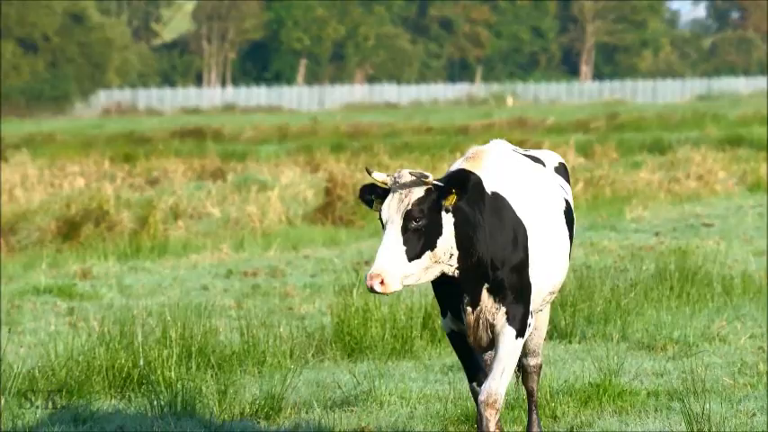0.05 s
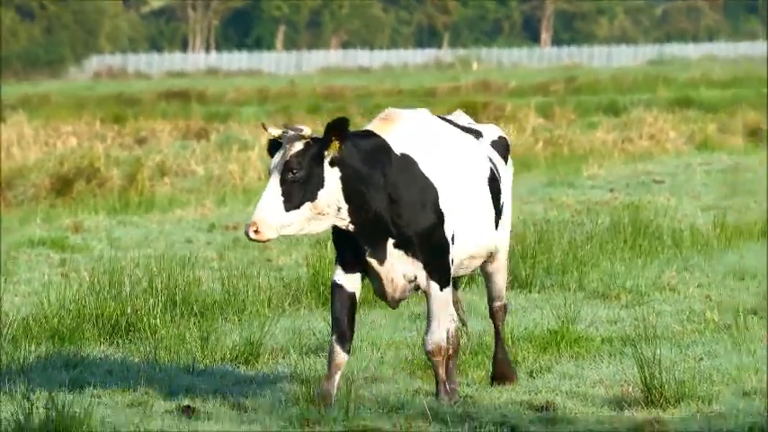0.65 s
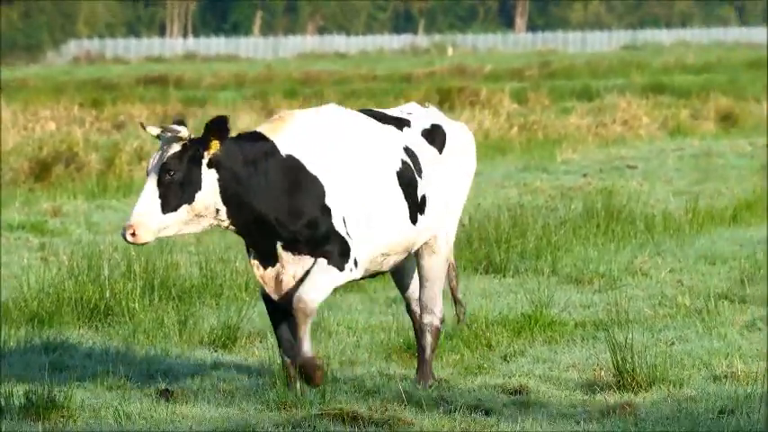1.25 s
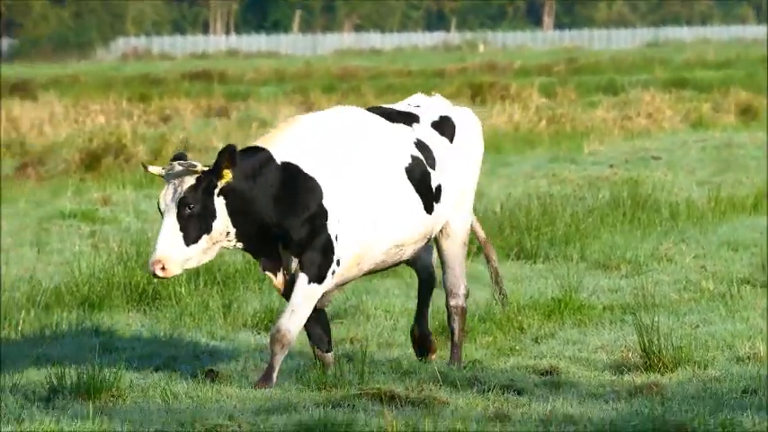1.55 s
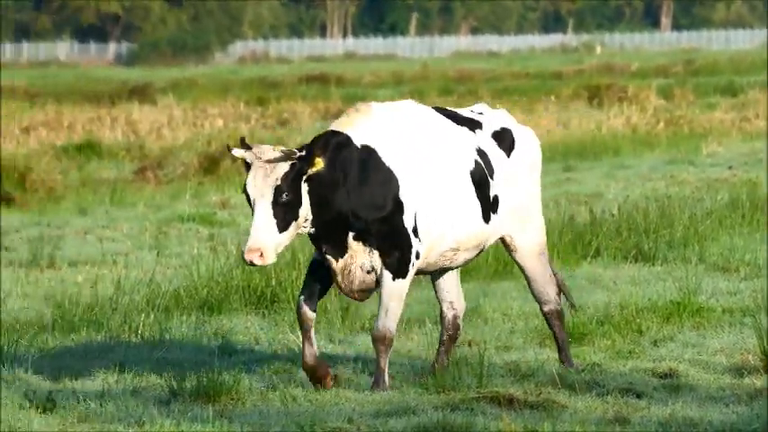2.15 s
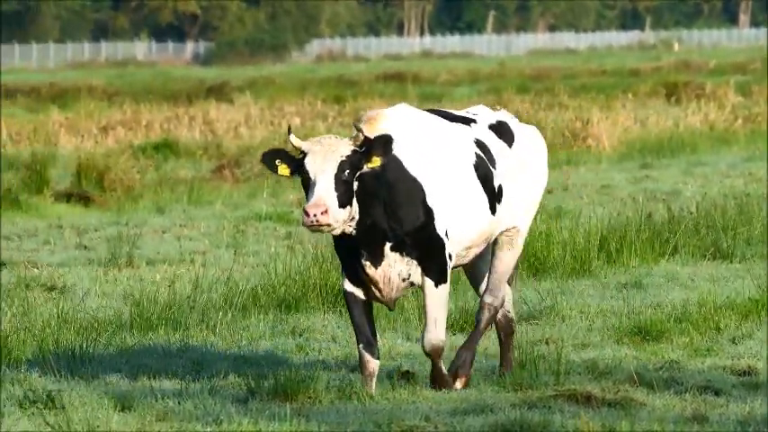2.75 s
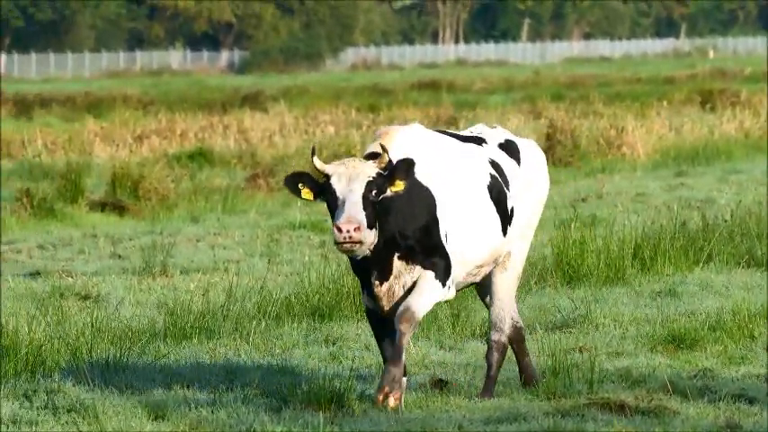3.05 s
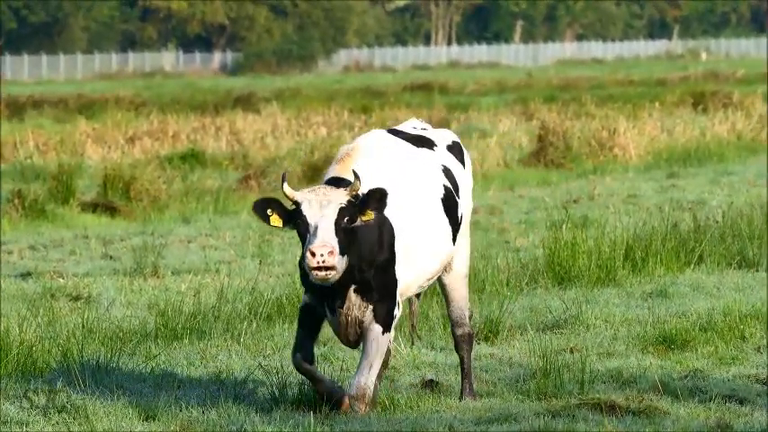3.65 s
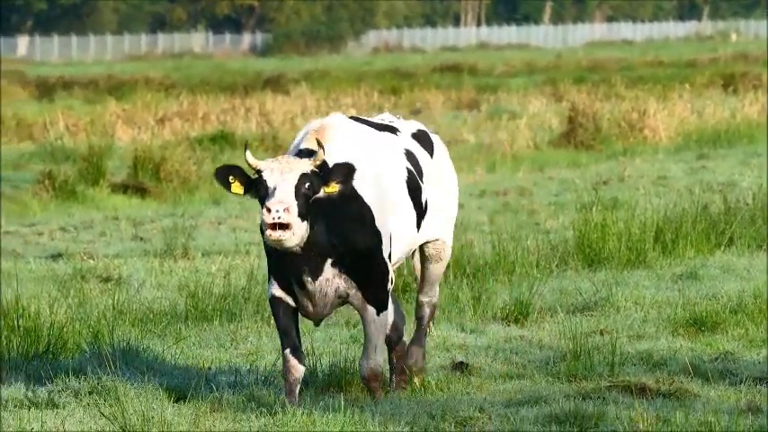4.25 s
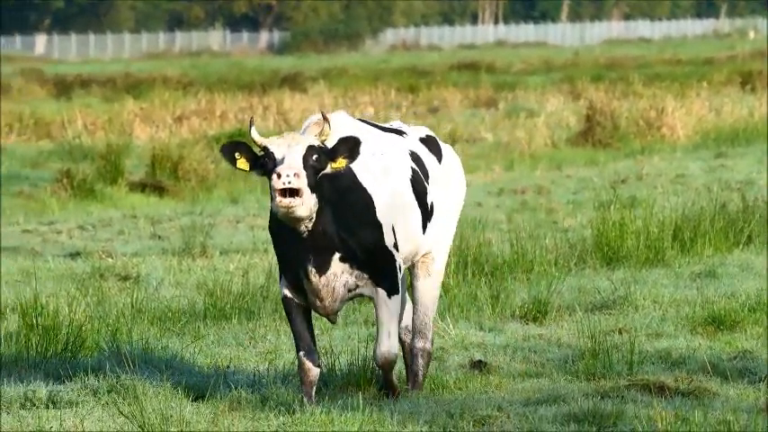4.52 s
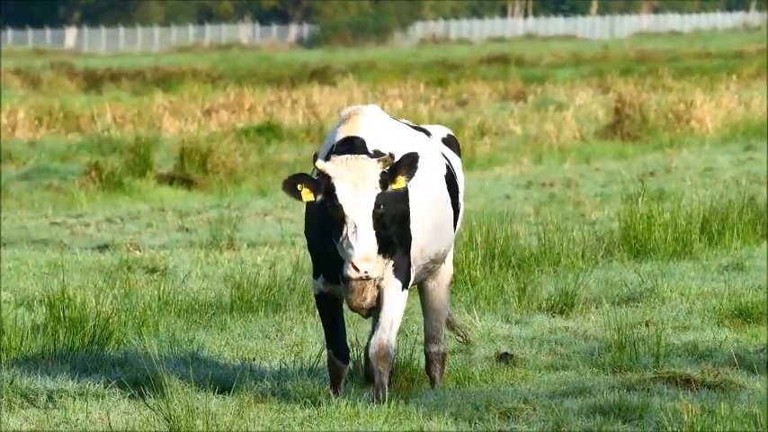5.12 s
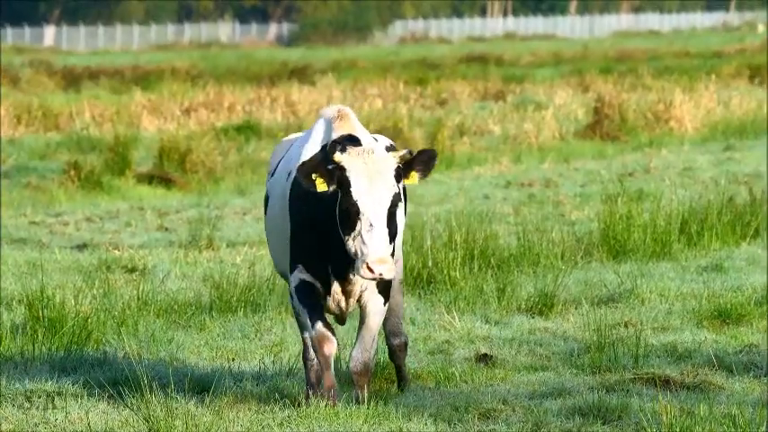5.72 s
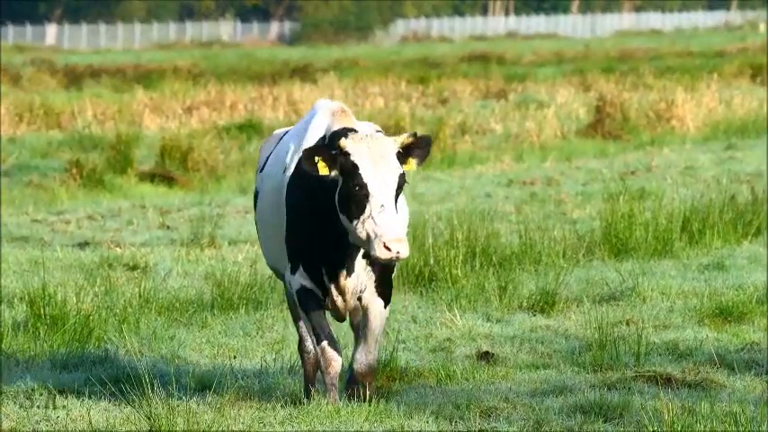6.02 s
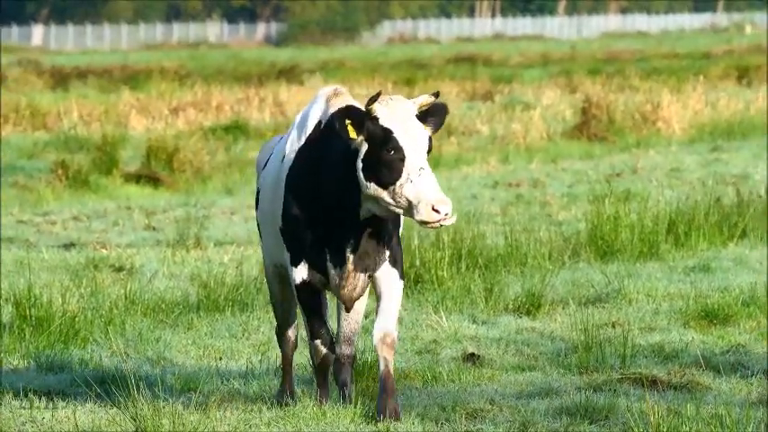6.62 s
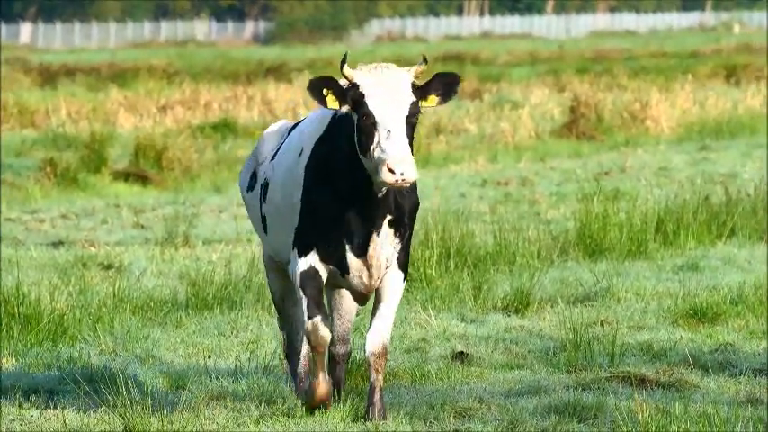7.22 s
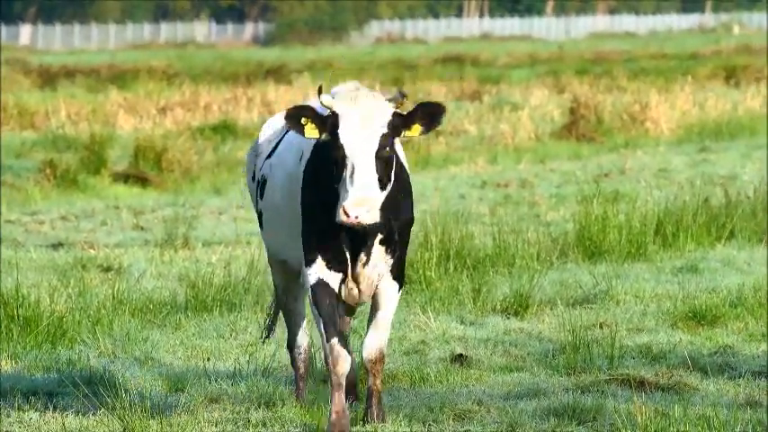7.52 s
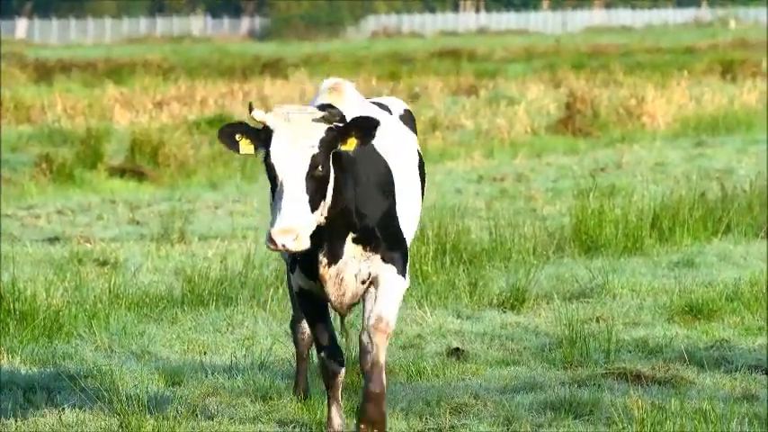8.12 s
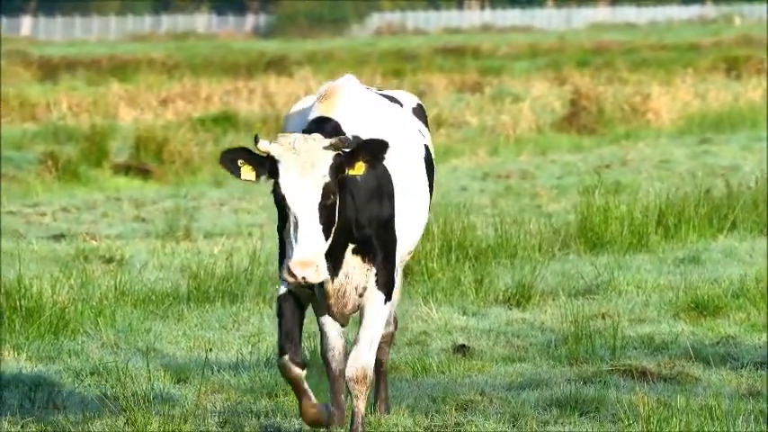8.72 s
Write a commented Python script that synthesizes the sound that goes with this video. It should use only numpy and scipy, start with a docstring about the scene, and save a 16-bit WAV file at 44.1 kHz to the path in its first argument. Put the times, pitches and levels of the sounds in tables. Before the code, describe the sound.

One cow bellow climbs from a low growl to a roar, over wind on the microphone, faint bird chirps and hooves in grass.

```python
"""Wind rumbles on the microphone over a distant wash; hooves thud and tick in the grass, and a small
bird repeats one rising, two-voiced call. Then the walking cow bellows once: a low pulsing growl
climbs, breaks into a rough roar, clears and drops. Its vocal folds pulse through a moving mouth over
a booming chest, and flapping tissue adds the grit. A far tree line answers."""
import sys
import numpy as np
from scipy import signal
from scipy.fft import rfft, irfft, next_fast_len
from scipy.io import wavfile
from scipy.ndimage import uniform_filter1d, minimum_filter1d, map_coordinates

SR = 44100
rng = np.random.default_rng(int(sys.argv[2]) if len(sys.argv) > 2 else 0)


def dump_mix(stems):
    """Bounce the given channels to the path in sys.argv[1] as a 16-bit WAV at rate SR."""
    frames = np.atleast_2d(stems).T  # one column per channel
    limited = np.clip(frames, -1, 1)  # hard clip at full scale
    pcm = np.round(limited * 32767).astype(np.int16)
    wavfile.write(sys.argv[1], SR, pcm)


N = 391166

# wind rumble between gusts: t/s, level/dB
BREEZE = [(0, -21), (.9, -17.5), (1.5, -19), (2.2, -16.5), (2.7, -28), (4.6, -38), (5.4, -29.5),
          (7.6, -28.5), (8.87, -20)]
# gusts: t/s, level/dB, half length/s
GUSTS = [(.23, -19, 0.095), (.68, -7.5, 0.052), (5.27, -30.5, 0.046), (6.1, -29.5, 0.051),
         (6.62, -33, 0.017), (7.17, -34.5, 0.043), (8.2, -28, 0.033)]
# EQ of the wind's rumble and buffeting, and of the country's wash and hiss: f/Hz, level/dB
RUMBLE_EQ = [(8, 5.5), (20, -7), (27, 18.5), (34, 0.5), (48, -17.5), (80, -37.5), (250, -120)]
BUFFET_EQ = [(30, -21), (50, -1.5), (80, -6), (120, -12.5), (200, -23.5), (400, -44.5), (1500, -110)]
WASH_EQ = [(120, -18), (200, -5), (355, -7), (431, -8.5), (582, -8.5), (698, -6), (1310, -10.5),
           (1490, -13), (2890, -25), (4500, -28), (5850, -73), (9900, -120)]
HISS_EQ = [(1500, -22.5), (3000, -7), (4200, -2.5), (5300, 4.5), (7000, 0.5), (10000, -2.5), (15700, -6)]
# hoof falls: t/s, level/dB, thud f/Hz
HOOVES = [(0.135, -33, 252), (1.567, -35.5, 680), (2.074, -25.5, 381), (5.949, -26.5, 223),
          (6.527, -41, 332), (6.759, -31.5, 340), (7.573, -38, 321), (8.523, -35.5, 266),
          (8.81, -33.5, 360)]
# stalks snapping: t/s, relative level/dB
STALKS = [(0.136, -32), (0.597, -31.5), (0.9164, -41), (0.9746, -39), (1.024, -39.5), (1.38, -41),
          (2.1055, -38), (2.313, -40.5), (2.8568, -34), (7.2773, -40), (7.53, -42), (8.4731, -38),
          (8.524, -37), (8.6327, -38.5)]
# legs brushing the grass: t/s, level/dB, half length/s
BRUSHES = [(5.661, -54, 0.0222), (5.963, -49, 0.021), (6.544, -54, 0.018), (7.206, -42.5, 0.037),
           (8.76, -45.5, 0.044)]
# EQ of snaps, brushes and ticks: f/Hz, level/dB
SNAP_EQ = [(500, 1), (6000, 5), (15000, -7)]
BRUSH_EQ = [(300, -21), (900, 10), (1600, 7), (2800, -10), (5500, -11), (14000, -32)]
TICK_EQ = [(1000, -14.5), (5500, 3.5), (15000, -11.5)]
# bird calls: top note t/s, relative sweep level/dB, relative whistle level/dB, top note accent/dB
CALLS = [(0.333, -36.5, -47, -4), (1.783, -34.5, -41.5, -1.5), (3.492, -49, -59.5, 6.5),
         (5.208, -42.5, -52, 5), (6.783, -38, -48, -1), (8.137, -37, -40, 7)]
# the two voices of a call: t/s from the top note, f/Hz, relative level/dB
SWEEP = [(-.15, 2400, -26), (-.13, 2520, -17.5), (-.05, 3100, -13), (-.035, 3485, -5.5), (-.02, 3613, -4.5),
         (-.01, 3950, -2), (0, 4417, -0.5), (.018, 4450, -4.5), (.032, 4380, -29)]
WHISTLE = [(-.15, 4600, -28), (-.135, 4900, -3), (-.095, 5350, -6), (-.06, 5850, -11), (-.045, 5950, -36)]
# pitch of the bellow: t/s, f/Hz
PITCH = [(2.38, 61.72), (2.69, 93.2), (2.74, 104.4), (2.9, 129.4), (3.0, 167.4), (3.12, 204.1),
         (3.17, 237.7), (3.4, 239.8), (3.46, 258.6), (3.58, 253.7), (3.79, 275.1), (4.01, 276.3),
         (4.35, 300.5), (4.61, 308.5), (4.8, 304.5), (4.91, 293.5), (4.95, 274), (5.0, 201.6)]
# how hard the cow pushes: t/s, throat level/dB
EFFORT = [(2.38, -44), (2.5, -35.5), (2.68, -24), (2.76, -30), (2.83, -26), (3.34, -25.5), (3.48, -29),
          (3.98, -27.5), (4.1, -32.5), (4.38, -25), (4.66, -23.5), (4.87, -25), (4.97, -30), (5.0, -51)]
# rough spells of the larynx: start t/s, end t/s, roughness, added breath share
SPELLS = [(2.998, 3.153, 1.03, 0.26), (3.141, 3.491, .62, 0.44), (3.66, 3.865, 0.41, 0.4),
          (4.496, 4.684, 0.04, 0), (4.687, 4.813, .17, 0.2), (4.945, 5.05, .6, 0.58)]
# mouth moves: t/s, opening (0 shut, 1 half, 2 taut, 3 wide; more only lifts the rasp), resonance factor
MOUTH = [(2.45, 1.3, 1.105), (2.68, 0, 1.036), (2.95, 1.13, 0.99), (3.2, 1, 0.96), (3.45, 1, 0.96),
         (4.02, 2.5, 1.014), (4.13, 5, 1.01), (4.3, 2.5, 1.036), (4.6, 4.5, 0.98), (4.98, 2.5, 0.976)]
# throat resonances from nearly shut to wide open: f/Hz, level/dB
SHUT = [(200, -76.5), (340, -1), (460, -7.5), (560, -23.5), (850, 1), (1230, -6), (1440, 13), (1780, -5),
        (2000, 3), (2220, -28), (2660, -2.5), (3100, -20), (4500, -28.5), (7000, -80.5)]
HALF = [(120, -78.5), (320, 4), (470, -7), (560, -16.5), (680, -11), (830, 5.5), (990, -1.5), (1170, -0.5),
        (1560, 0.5), (1950, -8.5), (2550, -13), (3200, -29.5), (7000, -78.5)]
TAUT = [(150, -65), (380, -1), (680, -17.5), (830, -2), (950, -3.5), (1100, 7), (1380, 4), (1650, -5),
        (2450, 0.5), (2700, -15.5), (3600, -43), (7000, -89)]
WIDE = [(150, -63), (380, -2), (520, -15), (720, -12), (880, 9.5), (1040, -7), (1300, 5.5), (1850, -5.5),
        (2300, -9.5), (2800, -17), (3350, -28.5), (3900, -42), (7000, -91.5)]
# what chest and nose let through: f/Hz, level/dB
CHEST_EQ = [(70, 2), (250, 0.5), (290, 0.5), (312, -3.5), (380, -7.5), (475, -8), (520, -27), (570, -48.5),
            (600, -18.5), (620, -10.5), (700, -34), (900, -73.5)]
# EQ of the voice's rasp, its treble flare and its scatter off the turf: f/Hz, level/dB
RASP_EQ = [(2200, -70), (3500, -9.5), (4100, -16), (4900, 1), (5400, -0.5), (6500, -14.5), (7100, -11.5),
           (7800, -21), (9200, -25), (11500, -39.5), (15500, -53.5)]
FLARE_EQ = [(4000, -50.5), (7800, 1), (9200, 2), (12500, -15), (15500, -28.5)]
TURF_EQ = [(400, -40), (900, -6), (1500, 0)]

WASH_DB, HISS_DB, BUFFET_DB = -45.5, -58.5, -26
DUCK_DB, DUCK_S, RETURN_DB_PER_S = 6.5, 0.32, 1.27  # the bed sinks behind the roar and creeps back
BELLOW_START_S, BELLOW_END_S = PITCH[0][0], PITCH[-1][0]
GROWL_DB, ROAR_DB, BREAK_AT_S, BREAK_S = -24.5, -16, 2.95, 0.063  # chest drive jumps into the roar
SWELL_DB, SWELL_S, RELEASE_DB, RELEASE_S = 20.5, 0.29, 17, 0.048  # the chest's attack and release
FLAP_RATIO, FLAP_FLOOR_HZ = .76, 161  # loose tissue flaps below the pitch of the folds
RASP_DB, RASP_SOFT_DB, RASP_FROM_S, RASP_RISE_S = -26.5, -14, 2.53, 0.23  # rasp against the throat
FLARE_DB, FLARE_PITCH_HZ, FLARE_DB_PER_HZ = -58, 308.2, 1.4  # the flare fades below this pitch
CEILING, TOP_HZ = .5, 15750


def amp(db):
    """Decibels to gain."""
    return 10 ** (np.asarray(db) / 20)


def unit(x):
    """Scale to rms 1."""
    return x / np.sqrt(np.mean(x ** 2) + 1e-20)


def steady(x, size=2600):
    """Ride the rms to 1 over windows of size samples."""
    return x / np.sqrt(np.abs(uniform_filter1d(x ** 2, size=size)) + 1e-12)


def curves(rows):
    """One automation curve for each column after the time."""
    s, *cols = np.transpose(rows)
    return [np.interp(np.arange(N) / SR, s, c) for c in cols]


def ramp(start, length):
    """Rise from 0 to 1 over length seconds from start."""
    return np.clip((np.arange(N) / SR - start) / length, 0, 1)


def swells(rows):
    """A bell-shaped envelope for each row of t/s, level/dB, half length/s."""
    return sum(amp(db) * np.exp(-((np.arange(N) / SR - s) / width) ** 2 / 2) for s, db, width in rows)


def wobble(rate):
    """Smooth random modulation, rate knots a second."""
    return map_coordinates(rng.standard_normal(int(N * rate / SR) + 4), [np.arange(N) * rate / SR])


def colour(x, eq):
    """Minimum-phase EQ through points of f/Hz, level/dB."""
    m = 2 * next_fast_len(N // 2 + 8192)
    hz, db = np.transpose(eq)
    gain = amp(np.interp(np.log(np.fft.rfftfreq(m, 1 / SR) + 1), np.log(hz), db))
    cepstrum = irfft(np.log(gain + 1e-6))
    cepstrum[1:m // 2] *= 2
    cepstrum[m // 2 + 1:] = 0
    return irfft(rfft(x, m) * np.exp(rfft(cepstrum)))[:N]


def noise(eq):
    """Coloured noise of rms 1."""
    return unit(colour(rng.standard_normal(N), eq))


def pulses(at, sizes):
    """Sharp pulses placed between samples."""
    taps = at.astype(int)[:, None] + np.arange(-7, 9)
    offset = taps - at[:, None]
    shape = np.sinc(offset) * np.sinc(offset / 8)
    return np.bincount(np.clip(taps, 0, N - 1).ravel(), (sizes[:, None] * shape).ravel(), N)


def echo(x, t60, rise_s):
    """The diffuse reverb of trees and ground."""
    t = np.arange(SR) / SR
    tail = rng.standard_normal(SR) * amp(-60 * t / t60) * (1 - np.exp(-t / rise_s))
    return signal.fftconvolve(x, tail / np.linalg.norm(tail))[:N]


def wind():
    """Wind shakes the microphone: a sub rumble, and buffeting that follows it at half the depth."""
    breeze_db = curves(BREEZE)[0] + 2.8 * wobble(11)
    wind_db = 20 * np.log10(amp(breeze_db) + swells(GUSTS))
    rumble = amp(wind_db) * steady(noise(RUMBLE_EQ), size=8000)
    buffet = amp(BUFFET_DB + 0.49 * wind_db + 1.1 * wobble(15)) * noise(BUFFET_EQ)
    return rumble + buffet


def country():
    """A bed of distant wash and hiss from open country, ducked behind the roar."""
    wash = amp(WASH_DB + 1.3 * wobble(11)) * noise(WASH_EQ)
    hiss = amp(HISS_DB) * noise(HISS_EQ)
    since_bellow = np.maximum(np.arange(N) / SR - BELLOW_END_S, 0)
    duck_db = np.maximum(DUCK_DB * ramp(BREAK_AT_S, DUCK_S) - RETURN_DB_PER_S * since_bellow, 0)
    return amp(-duck_db) * (wash + hiss)


def rustle():
    """Tiny scattered ticks of wet grass."""
    when, strength = rng.random((90, 2)).T
    ticks = pulses(when * (N - 1), amp(-54.5 + 25 * strength ** 2))
    return colour(ticks + echo(ticks, t60=.02, rise_s=.001), TICK_EQ)


def steps():
    """Hooves thud in soft turf, stalks snap and legs brush the grass."""
    t = np.arange(SR // 4) / SR
    thuds, snaps = np.zeros(N + SR), np.zeros(N + SR)
    for s, db, hz in HOOVES:
        band = signal.butter(2, [hz * 0.56, hz * 1.21], "band", fs=SR, output="sos")
        turf = unit(signal.sosfilt(band, rng.standard_normal(len(t))))
        squelch = amp(-25) * rng.standard_normal(len(t)) * amp(-60 * t / .05)
        envelope = amp(-60 * t / 0.081) * (1 - np.exp(-t / 0.0009))
        thuds[round(s * SR):][:len(t)] += amp(db) * (turf + squelch) * envelope
    for s, db in STALKS:
        snaps[round(s * SR):][:len(t)] += amp(db - 3) * rng.standard_normal(len(t)) * amp(-60 * t / .014)
    return thuds[:N] + colour(snaps[:N], SNAP_EQ) + swells(BRUSHES) * noise(BRUSH_EQ)


def bird(accent_rise_s=0.0075):
    """Two voices of the syrinx rise together with a slight warble, blurred by the trees."""
    t, song = np.arange(N) / SR, np.zeros(N)
    warble = 1 + .007 * wobble(130)
    flutter_db = 3 * wobble(70)
    for s, sweep_db, whistle_db, accent_db in CALLS:
        detune = 1 + .006 * rng.standard_normal()
        stress_db = flutter_db + accent_db * ramp(s - accent_rise_s, accent_rise_s)
        for voice, db in ((SWEEP, sweep_db), (WHISTLE, whistle_db)):
            when, hz, level = np.transpose(voice)
            on = (t > s + when[0]) & (t < s + when[-1])
            pitch = np.interp(t[on] - s, when, hz) * detune * warble[on]
            envelope = amp(db + stress_db[on] + np.interp(t[on] - s, when, level))
            song[on] += envelope * np.sin(2 * np.pi * np.cumsum(pitch) / SR)
    return amp(-2.5) * (song + echo(song, t60=0.32, rise_s=0.003))


def cow():
    """Folds and breath drive the throat over a chest boom; a slower flap roughens the roar."""
    pitch, = curves(PITCH)
    throat_db, = curves(EFFORT)
    breath, scatter, flap_depth = larynx()
    gate = ramp(BELLOW_START_S, 0.041) * (1 - ramp(BELLOW_END_S - .008, 0.0083))
    jitter = (0.0014 + .3 * scatter) * wobble(90)
    waver = .0022 * wobble(22)
    cycles = np.cumsum(pitch * (1 + jitter + waver)) / SR
    flap_hz = np.maximum(FLAP_RATIO * pitch, FLAP_FLOOR_HZ) * (1 + .033 * wobble(40))
    flap_cycles = np.cumsum(flap_hz) / SR
    beat = flap_depth * np.sin(2 * np.pi * (cycles - flap_cycles))
    folds = vocal_folds(pitch, cycles, scatter, beat)
    # air bursts through just after every pulse
    air = steady(rng.standard_normal(N) * (.2 + np.exp(-(cycles % 1) / .25)))
    source = muzzle(np.sqrt(1 - breath) * folds + np.sqrt(breath) * air)
    treble = rasp(folds + 1.1 * air, throat_db, flap_depth) + flare(air, pitch)
    boom = chest(pitch, cycles, flap_cycles, flap_depth) + grunt()
    jolt_db = 3.5 * flap_depth * wobble(45)
    return gate * (boom + amp(throat_db + jolt_db) * throat(source) + treble)


def larynx(fade_s=.07):
    """Breath share, timing scatter (in cycles) and flap depth rise in the rough spells."""
    rough, breath = np.zeros(N), np.full(N, 0.16)
    for start, end, roughness, share in SPELLS:
        spell = ramp(start - fade_s / 2, fade_s) - ramp(end - fade_s / 2, fade_s)
        rough += roughness * spell
        breath += share * spell
    scatter = .005 + .07 * rough
    flap_depth = 0.031 + 0.57 * rough
    return np.clip([breath, scatter, flap_depth], 0, 1)


def vocal_folds(pitch, cycles, scatter, beat):
    """One pulse a cycle, pushed about in time and size by chance and by the beat with the flap."""
    at = np.interp(np.arange(1, int(cycles[-1])), cycles, np.arange(N))
    i = at.astype(int)
    slip, shimmer = rng.standard_normal((len(at), 2)).T
    late_cycles = scatter[i] * slip + 0.17 * beat[i]
    sizes = amp(32 * scatter[i] * shimmer) * (1 + beat[i])
    return steady(pulses(at + SR / pitch[i] * late_cycles, sizes))


def muzzle(x):
    """Reflections in the long nose and mouth make some high overtones strong and others weak."""
    t = np.arange(SR // 50) / SR
    walls = rng.standard_normal(len(t)) * amp(-60 * t / .022) * (t > .0005)
    walls = signal.sosfilt(signal.butter(4, 3000, "high", fs=SR, output="sos"), walls)
    return x + amp(-3) * signal.fftconvolve(x, walls / np.linalg.norm(walls))[:N]


def neck(source, eqs):
    """The stretching neck slides all resonances: a shorter throat filters on a faster clock."""
    _, raised = curves(MOUTH)
    clock = np.cumsum(raised)
    clock -= clock[N // 2] - N // 2
    warped = map_coordinates(source, [np.interp(np.arange(N), clock, np.arange(N))])
    return [map_coordinates(colour(warped, eq), [clock], mode="nearest") for eq in eqs]


def throat(source):
    """The moving mouth crossfades between four vowels."""
    vowels = neck(source, (SHUT, HALF, TAUT, WIDE))
    shape = np.clip(curves(MOUTH)[0], 0, len(vowels) - 1)
    return steady(sum(np.maximum(1 - abs(shape - k), 0) * vowel for k, vowel in enumerate(vowels)))


def chest(pitch, cycles, flap_cycles, flap_depth):
    """The lowest partials and the flap boom through nose and chest; flapping dims the overtones."""
    level_db = GROWL_DB + (ROAR_DB - GROWL_DB) * ramp(BREAK_AT_S, BREAK_S)
    level_db -= SWELL_DB * (1 - ramp(BELLOW_START_S, SWELL_S))
    level_db -= RELEASE_DB * ramp(BELLOW_END_S - RELEASE_S, RELEASE_S)
    partials = []
    for k in range(1, 7):
        db = -3 * np.log2(k) + np.interp(k * pitch, *np.transpose(CHEST_EQ))
        partials.append(amp(db) * np.sin(2 * np.pi * k * cycles))
    overtones = amp(-25 * flap_depth) * sum(partials[1:])
    flapping = 0.9 * flap_depth * np.sin(2 * np.pi * flap_cycles)
    return np.sqrt(2) * amp(level_db) * (partials[0] + overtones + flapping)


def rasp(source, throat_db, flap_depth):
    """A bright edge enters once the growl is under way, grows with effort and escapes the open mouth."""
    opening, _ = curves(MOUTH)  # each step of opening adds 1 dB
    level_db = throat_db + RASP_DB + opening + RASP_SOFT_DB * (1 - ramp(RASP_FROM_S, RASP_RISE_S))
    edge = steady(neck(muzzle(source), [RASP_EQ])[0])
    return edge * amp(level_db + wobble(120) + 7 * flap_depth * wobble(45))


def flare(air, pitch):
    """At the top of the pitch the breath flares into the high treble."""
    level_db = FLARE_DB - FLARE_DB_PER_HZ * np.maximum(FLARE_PITCH_HZ - pitch, 0)
    return amp(level_db) * steady(colour(muzzle(np.roll(air, 500)), FLARE_EQ))


def grunt(at_s=4.962, db=-26, half_s=.011, centre_hz=135.3, fall_octaves_per_s=20):
    """A few slack, falling beats of the larynx close the bellow."""
    t = np.clip(np.arange(N) / SR - at_s, -.1, .1)
    hz = centre_hz * 2 ** (-fall_octaves_per_s * t)
    return swells([(at_s, db, half_s)]) * np.sqrt(2) * np.sin(2 * np.pi * np.cumsum(hz) / SR)


def scene():
    """The mono pasture mix: the bellow scatters off nearby turf and the trees answer faintly."""
    voice = cow()
    turf = amp(-12) * echo(colour(voice, TURF_EQ), t60=.06, rise_s=.005)
    trees = amp(-20) * echo(voice, t60=1.0, rise_s=.08)
    return (voice + turf + trees + bird() + steps() + rustle() + wind() + country())[None]


def record(dry):
    """A limiter holds down the peaks, and a brick-wall low-pass trims the top."""
    needed = np.minimum(1, CEILING / (np.abs(dry) + 1e-9))
    gain = uniform_filter1d(minimum_filter1d(needed, size=1400), size=700)
    m = next_fast_len(N + SR)
    passband = np.fft.rfftfreq(m, 1 / SR) < TOP_HZ
    return irfft(rfft(dry * gain, m) * passband, m)[..., :N]


dry = scene()
out = record(dry)
dump_mix(out)
```